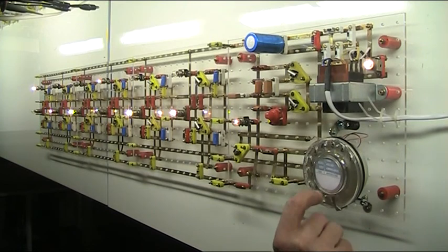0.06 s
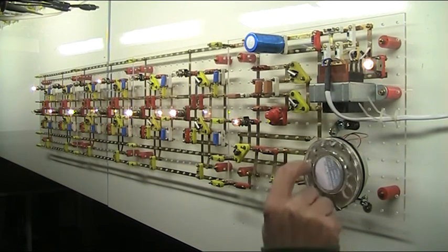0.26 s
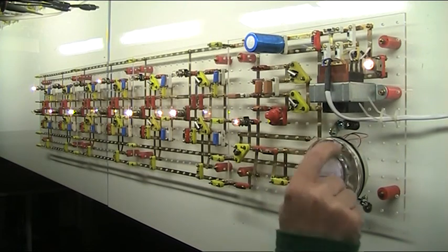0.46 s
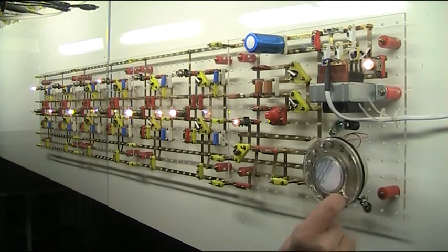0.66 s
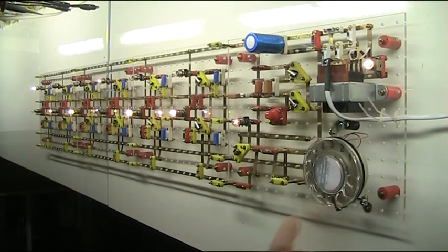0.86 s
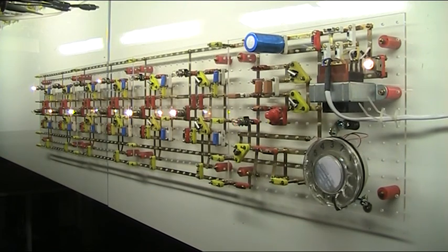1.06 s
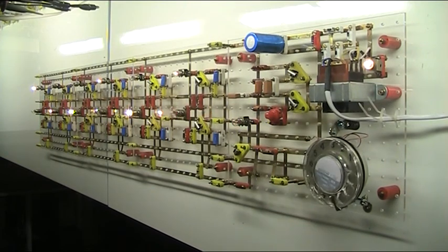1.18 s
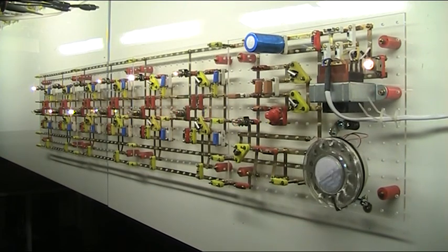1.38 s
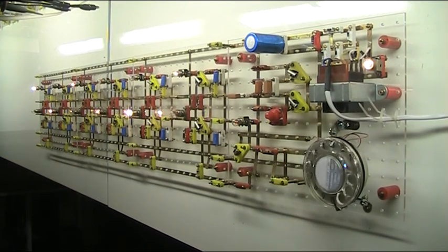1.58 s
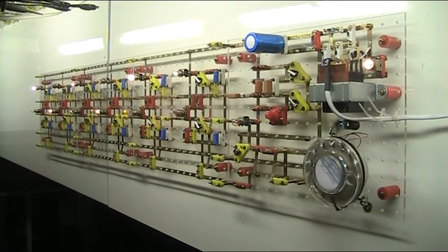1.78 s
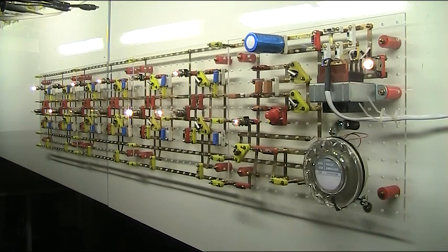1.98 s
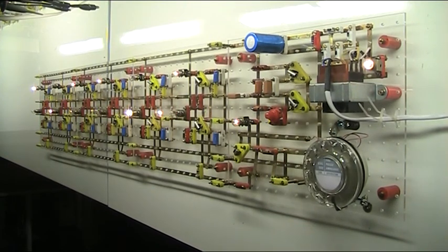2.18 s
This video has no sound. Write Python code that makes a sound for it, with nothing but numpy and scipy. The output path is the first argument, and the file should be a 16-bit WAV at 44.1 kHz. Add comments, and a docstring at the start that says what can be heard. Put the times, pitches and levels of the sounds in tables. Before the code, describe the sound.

A rotary telephone dial is wound with ratchet clicks, then whirs back and clacks to rest.

```python
"""A small, quiet room with a rotary telephone dial on a wall panel, a little to the right.
A finger winds the dial; the pawl snaps over ten ratchet teeth up to the finger stop.
Let go, the wheel runs back at a governed speed: the governor rattles on every turn, the gears rasp,
the pulse contact ticks and the panel hums, until the wheel knocks against its rest."""
import sys
import numpy as np
from scipy import signal
from scipy.fft import rfft, irfft, next_fast_len
from scipy.io import wavfile
from scipy.ndimage import map_coordinates

SR = 44100
rng = np.random.default_rng(int(sys.argv[2]) if len(sys.argv) > 2 else 0)


def unload_audio(sound):
    """Save the sound as a 16-bit wav file, at the path given as the first command line argument."""
    columns = np.transpose(np.atleast_2d(sound))
    # keep every value between -1 and 1, then stretch to whole-number steps
    steps = np.round(np.clip(columns, -1, 1) * 32767)
    wavfile.write(sys.argv[1], SR, steps.astype(np.int16))


N = 99225
RELEASE_S, REST_S, GOVERNOR_HZ = 0.7874, 1.956, 63.49

# ratchet teeth: start_s, snap_db, thud_db, thud_pitch_ratio, spring_hz, treble_db, ping_db
RATCHET_TEETH = [(0.2127, -29.5, -24.5, 1, 6900, 2.5, -5), (0.2588, -30.5, -28, 0.95, 2600, 1.5, -16),
                 (0.3074, -29, -29, 0.96, 5670, -2.5, -15), (0.359, -31, -30, 0.98, 5330, -0.5, -5.5),
                 (0.4124, -30.5, -29.5, 0.97, 4870, 0, -9), (0.459, -32.5, -29.5, 0.96, 4700, 5, -16),
                 (0.4976, -31.5, -29, 1.02, 5030, 3, -22), (.5358, -31.5, -32.5, 1, 3900, 3.5, -16.5),
                 (0.5743, -31.5, -28, 1.1, 3700, 2, -13), (0.6092, -31.5, -31.5, 0.97, 2730, 7, 4)]
# gear rub while winding: time_s, level_db
RUB_ENVELOPE = [(.05, -77), (.08, -67.5), (.2, -64), (.23, -56), (.4, -56.5), (.52, -46.5), (.56, -45.5),
                (.63, -45), (.655, -72), (.7, -94.5)]
# hits on the stops: start_s, clack_db, thump_db, treble_db
STOP_HITS = [(0.0672, -46.5, -67, -10), (.553, -37, -59, 6), (0.5701, -34, -83, 9),
             (.622, -30.5, -33.5, -15), (.634, -32.5, -30, -12), (0.721, -43, -66, -12),
             (0.742, -46, -67, -8), (1.933, -33, -46, 0), (1.95, -29, -50, -8), (1.959, -32.5, -30, 1)]
# pulse contact flicks: start_s, level_db
PULSE_FLICKS = [(.886, -40.5), (.996, -37.5), (1.084, -39.5), (1.167, -38), (1.273, -42), (1.372, -42.5),
                (1.483, -37), (1.578, -37), (1.674, -36.5), (1.774, -36), (1.876, -39.5)]
# strength of the return run: time_s, level_db
RETURN_ENVELOPE = [(.79, -3), (.86, -1.5), (.92, -0.5), (1.08, -1.5), (1.2, 0), (1.35, 1.2), (1.55, 0),
                   (1.8, 0.5), (1.95, 0)]
# governor weight hits in one turn: phase_turns, level_db
WEIGHT_HITS = [(.08, 4), (.29, 6), (.37, 3.5), (0.761, -2), (0.899, 1.5)]
# panel hum: governor_harmonic, level_db
HUM_HARMONICS = [(1, -74), (2, -44.5), (3, -65.5), (4, -51.5), (5, -69)]
# panel thud: pitch_hz, level_db
THUD_PARTIALS = [(464, -3.5), (375, -21.5), (500, -15), (243, -19.5)]
# modes of struck parts: pitch_hz, level_db, t60_s
PAWL_MODES = [(845, -16.5, 0.086), (1007, -16, 0.091), (1385, -21.5, 0.073), (1700, -12, 0.067),
              (1767, -9, 0.096), (2200, -14, 0.088), (2520, -22, 0.087), (3460, -13, 0.085)]
PANEL_MODES = [(63, -12, 0.24), (125.3, 0, .12), (172, -11, 0.073), (222, -30, 0.027)]
WHEEL_MODES = [(1550, -59, 0.11), (2200, -45, 0.05), (2460, -49, 0.041), (2920, -48, 0.046),
               (3375, -53, 0.049)]
END_STOP_MODES = [(788, -46.5, 0.05), (1410, -43, 0.064), (1530, -37, 0.057), (5150, -29, 0.046),
                  (7400, -38, 0.11)]
# resonances of running parts: centre_hz, width_hz, level_db
CUP_RESONANCES = [(3190, 300, -9.5), (3960, 190, -7.5), (4440, 310, -7), (5530, 1900, -15),
                  (6614, 357, 1.5), (8280, 365, -5), (9370, 620, -10.5), (11000, 210, -9.5),
                  (13900, 1300, -22)]
GEAR_RESONANCES = [(777, 28, -13), (1394, 57, 0), (2206, 40, 0), (3850, 43, 2.5), (4350, 37, -1)]
# noise spectra: freq_hz, level_db
SNAP_SPECTRUM = [(200, -7), (700, -1.5), (1100, 0.5), (1800, 2.5), (3000, -1), (5000, 1), (7200, -5),
                 (8300, -7.5), (9300, -1), (10300, -13), (12500, -7.5), (15500, -18)]
CLACK_SPECTRUM = [(150, 8), (500, 3.5), (1000, 3.5), (1450, -1.5), (2300, 5), (3300, -1.5), (5000, 1),
                  (7500, -5.5), (10000, -7), (15500, -24)]
RASP_SPECTRUM = [(30, -34), (50, -14), (70, 7.5), (90, -9), (160, 2.5), (230, 8), (340, -7.5), (470, 6),
                 (530, 5.5), (610, -4), (800, 2.5), (1200, -1.5), (1500, -1), (2700, -2.5), (4200, -1.5),
                 (8000, 0.5), (10000, -7.5), (12500, -6.5), (15500, -14)]
BACKGROUND_SPECTRUM = [(25, -47), (60, 4), (100, 2), (130, 16), (170, 6), (300, 6.5), (480, 8), (700, -2),
                       (1500, -2.5), (4000, -14), (8000, -22), (15500, -29.5)]
# left-right likeness: freq_hz, correlation
DIAL_CORRELATION = [(60, 0.26), (130, 0.68), (290, 1), (640, 1), (1410, 0.79), (3100, 0.78), (6820, 0.83),
                    (15000, 0.48)]
BACKGROUND_CORRELATION = [(60, 0.4), (180, -0.11), (550, -0.53), (1650, -0.85), (4970, -0.12),
                          (15000, 0.31)]
# dial balance: freq_hz, left_minus_right_db
DIAL_BALANCE = [(100, -3), (300, -0.2), (1400, -1.7), (3000, -2), (6000, -3.5), (9000, -0.1), (13000, -0.5)]
# dial phase: freq_hz, left_lead_rad
DIAL_PHASE = [(200, 0.5), (1290, -0.15), (2500, 0.4), (5700, 0.9), (7400, -1.1), (10000, 1.26), (13400, -3),
              (16000, -0.2)]
# room decay: freq_hz, t60_s
ROOM_DECAY = [(100, 0.43), (500, 0.29), (2000, 0.23), (7000, 0.14), (14000, 0.073)]


def ratchet(attack_s=0.00075, ping_hz=9120, spring_width_hz=290, spring_db=2.5, strike_db=-6):
    """Each tooth snaps the pawl and its spring and thuds the panel; the gears rub in between."""
    out = noise(SNAP_SPECTRUM) * envelope(RUB_ENVELOPE)
    for start_s, snap_db, thud_db, thud_ratio, spring_hz, treble_db, ping_db in RATCHET_TEETH:
        snap = crack(SNAP_SPECTRUM, treble_db, attack_s, hold_s=0.0024, t60_s=0.04)
        strike = crack(SNAP_SPECTRUM, treble_db + 17, attack_s=0.0011, hold_s=0.0006, t60_s=0.0053,
                       shelf_hz=11000)
        pawl = ring(PAWL_MODES + [(ping_hz, ping_db, 0.05)], attack_s)
        spring = resonate(snap, [(spring_hz, spring_width_hz, spring_db)])
        add(out, start_s, amp(snap_db) * (amp(strike_db) * strike + snap + pawl))
        add(out, start_s, amp(snap_db) * spring)
        add(out, start_s, amp(thud_db) * panel_thud(thud_ratio))
    return out


def knocks(touch_s=0.068, end_stop_s=1.951):
    """The finger lands on the wheel; finger and wheel clack on their stops and thump the panel."""
    out = np.zeros((2, N))
    add(out, touch_s, ring(WHEEL_MODES, attack_s=0.00081))
    add(out, end_stop_s, ring(END_STOP_MODES, attack_s=0.00062))
    for start_s, clack_db, thump_db, treble_db in STOP_HITS:
        clack = crack(CLACK_SPECTRUM, treble_db, attack_s=0.00051, hold_s=0.001, t60_s=0.053)
        add(out, start_s, amp(clack_db) * clack)
        add(out, start_s, amp(thump_db) * ring(PANEL_MODES, attack_s=0.0054, scatter_db=4.5))
    return out


def governor(level_db=-37, jitter_s=0.00049, t60_s=0.0082):
    """The weights chatter in their cup at nearly the same points of every turn."""
    turns = int((REST_S - RELEASE_S) * GOVERNOR_HZ)
    t = np.arange(SR // 50) / SR
    power = np.zeros(N)
    for phase_turns, hit_db in WEIGHT_HITS:
        for turn in range(turns):
            start_s = RELEASE_S + (turn + phase_turns) / GOVERNOR_HZ + jitter_s * rng.normal()
            add(power, start_s, amp(hit_db - 60 * t / t60_s) ** 2)
    rattle = unit_rms(resonate(noise() * np.sqrt(power), CUP_RESONANCES))
    return amp(level_db) * rattle * envelope(RETURN_ENVELOPE) * return_gate()


def gears(teeth_per_s=1800, scatter_db=3, grain_s=0.0027, rasp_db=-37.5, ring_db=-45.5):
    """Dense tooth contacts rasp and ring the wheels of the gear train."""
    contacts = (rng.random(N) < teeth_per_s / SR) * amp(scatter_db * rng.standard_normal(N)) ** 2
    power = signal.lfilter([1], [1, -np.exp(-1 / (grain_s * SR))], contacts)
    grain = unit_rms(np.sqrt(power))
    rasp = amp(rasp_db) * grain * noise(RASP_SPECTRUM)
    ringing = amp(ring_db) * unit_rms(resonate(grain * noise(), GEAR_RESONANCES))
    return (rasp + ringing) * np.sqrt(envelope(RETURN_ENVELOPE)) * return_gate()


def pulse_contact(tick_db=2):
    """The cam flicks the contact springs about ten times a second: a tick and a soft panel knock."""
    out = np.zeros((2, N))
    for start_s, level_db in PULSE_FLICKS:
        tick = crack(CLACK_SPECTRUM, treble_db=0, attack_s=0.001, hold_s=0.001, t60_s=0.046)
        add(out, start_s, amp(level_db + tick_db) * tick)
        add(out, start_s, amp(level_db) * panel_thud())
    return out


def panel_thud(pitch_ratio=1, peak_s=0.00598, sharpness=2.24):
    """The panel swells for a few cycles and is quickly damped."""
    t = np.arange(SR // 10) / SR
    swell = (t / peak_s * np.exp(1 - t / peak_s)) ** sharpness
    return swell * sum(amp(db) * np.sin(2 * np.pi * hz * pitch_ratio * (t - peak_s))
                       for hz, db in THUD_PARTIALS)


def panel_hum(waver_per_s=14):
    """The governor shakes the panel at multiples of its speed, each wavering by about 1 dB."""
    t = clock_s()
    hum = np.zeros(N)
    for harmonic, level_db in HUM_HARMONICS:
        waver_db = map_coordinates(rng.standard_normal(256), [t * waver_per_s], mode="mirror")
        hum += amp(level_db + waver_db) * np.sqrt(2) * np.sin(2 * np.pi * harmonic * GOVERNOR_HZ * t)
    return hum * return_gate(rise_s=0.03, fall_s=0.031, linger_s=0.037)


def room(x, tail_db=-10, echo_db=-10.5, echo_s=0.0215, echo_cutoff_hz=1200):
    """A short diffuse tail and one dull wall echo."""
    hz, t, bins = signal.stft(noise()[:, :SR // 2], SR, nperseg=256)
    decay = amp(-60 * t / log_interp(ROOM_DECAY, hz)[:, None])
    tail = signal.istft(bins * decay, SR, nperseg=256)[1]
    tail = np.pad(tail / np.linalg.norm(tail[0]), ((0, 0), (SR // 250, 0)))  # 4 ms pre-delay
    echo = filtered(x, lambda f: np.exp(-2j * np.pi * f * echo_s) / (1 + 1j * f / echo_cutoff_hz))
    return amp(tail_db) * signal.fftconvolve(x, tail, axes=1)[:, :N] + amp(echo_db) * echo


def background(level_db=-51):
    """Steady, low, diffuse room noise."""
    return amp(level_db) * noise(BACKGROUND_SPECTRUM, BACKGROUND_CORRELATION)


def crack(spectrum, treble_db, attack_s, hold_s, t60_s, shelf_hz=5000):
    """Hard contact: a noise burst with a treble shelf."""
    t = np.arange(SR // 3) / SR
    hz = np.fft.rfftfreq(len(t), 1 / SR)
    shelf = amp(treble_db * hz ** 2 / (hz ** 2 + shelf_hz ** 2))
    chatter = irfft(rfft(noise(spectrum, size=len(t))) * shelf, len(t))
    return chatter * np.minimum(t / attack_s, 1) * amp(-60 * np.maximum(t - hold_s, 0) / t60_s)


def ring(modes, attack_s, scatter_db=5.0):
    """Decaying modes after one blow."""
    t = np.arange(SR // 3) / SR
    ringing = sum(amp(db + scatter_db * rng.normal() - 60 * t / t60_s) * np.sin(2 * np.pi * hz * t)
                  for hz, db, t60_s in modes)
    return (1 - np.exp(-t / attack_s)) * ringing


def noise(spectrum=None, correlation=DIAL_CORRELATION, size=N):
    """Stereo noise, rms 1, of given spectrum and left-right correlation."""
    hz = np.fft.rfftfreq(size, 1 / SR)
    colour = amp(log_interp(spectrum, hz)) if spectrum else 1
    spread_rad = np.arccos(np.clip(log_interp(correlation, hz), -1, 1)) / 2
    bins = rfft(rng.standard_normal((2, size))) * colour
    mid, side = irfft(bins * np.array([np.cos(spread_rad), np.sin(spread_rad)]), size)
    return unit_rms(np.array([mid + side, mid - side]))


def resonate(x, peaks):
    """Parallel band-passes of alternating sign."""
    return filtered(x, lambda f: sum(
        (-1) ** k * amp(db) * 1j * f * width_hz / (hz * hz - f * f + 1j * f * width_hz)
        for k, (hz, width_hz, db) in enumerate(peaks)))


def filtered(x, response):
    """Apply a frequency response."""
    size = next_fast_len(N + SR // 2)
    return irfft(rfft(x, size) * response(np.fft.rfftfreq(size, 1 / SR)), size)[..., :N]


def return_gate(rise_s=0.012, fall_s=0.017, linger_s=0):
    """Gain that swells at the release and dies once the wheel rests."""
    t = clock_s()
    rise = 1 - np.exp(-np.maximum(t - RELEASE_S + 0.013, 0) / rise_s)
    return rise * np.exp(-np.maximum(t - REST_S - linger_s, 0) / fall_s)


def envelope(points):
    """Gain per sample from time_s, level_db points."""
    return amp(np.interp(clock_s(), *np.transpose(points)))


def log_interp(points, hz):
    """Interpolate on a log frequency axis."""
    freq_hz, values = np.transpose(points)
    return np.interp(np.log(hz + 1), np.log(freq_hz + 1), values)


def add(track, start_s, sound):
    """Mix in place."""
    part = track[..., max(round(start_s * SR), 0):][..., :sound.shape[-1]]
    part += sound[..., :part.shape[-1]]


def amp(db):
    return 10 ** (np.asarray(db) / 20)


def unit_rms(x):
    return x / np.sqrt(np.mean(x ** 2) + 1e-20)


def clock_s():
    return np.arange(N) / SR


def scene():
    """The dial, a little to the right, over the room's background."""
    dial = ratchet() + knocks() + governor() + gears() + pulse_contact()
    in_room = dial + room(dial) + panel_hum()
    halves = np.array([[0.5], [-0.5]])  # left, right
    placed = filtered(in_room, lambda hz: amp(log_interp(DIAL_BALANCE, hz) * halves)
                      * np.exp(1j * log_interp(DIAL_PHASE, hz) * halves))
    return placed + background()


def record(dry, low_cut_hz=42, top_hz=15850):
    """Microphone: bass roll-off and a hard band limit."""
    return filtered(dry, lambda hz: (hz < top_hz) * hz ** 2 / np.sqrt(hz ** 4 + low_cut_hz ** 4))


dry = scene()
out = record(dry)
unload_audio(out)
```